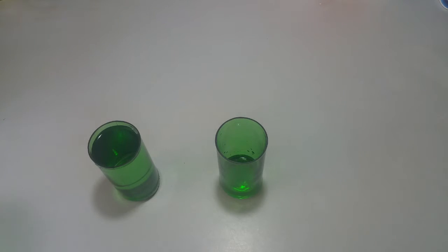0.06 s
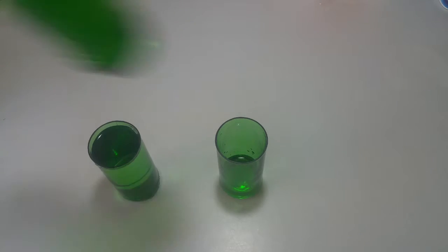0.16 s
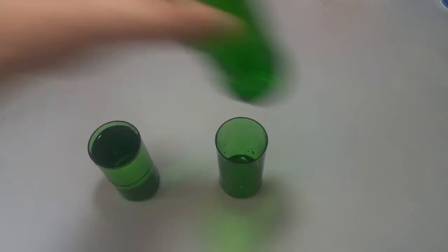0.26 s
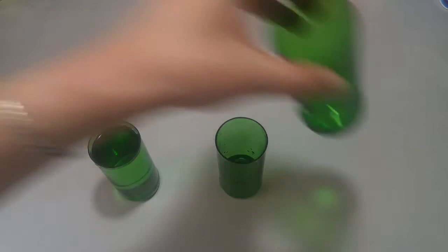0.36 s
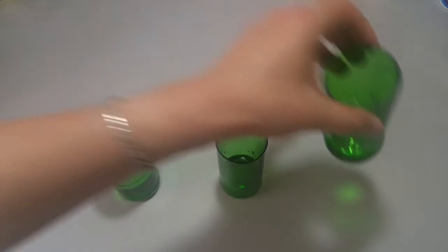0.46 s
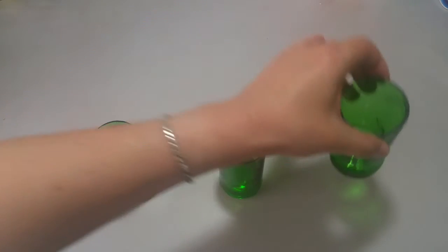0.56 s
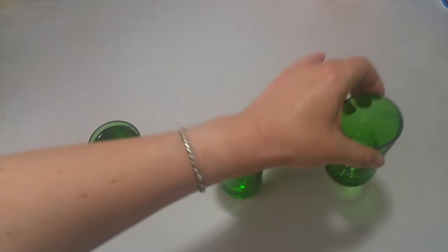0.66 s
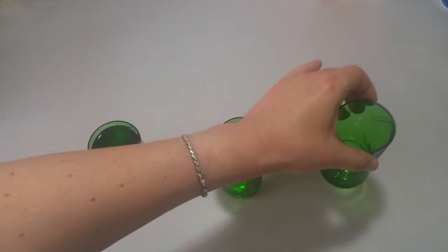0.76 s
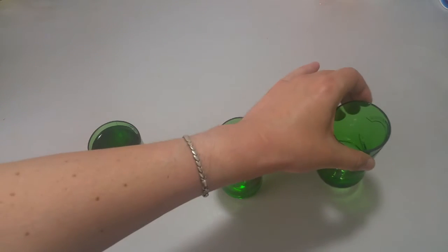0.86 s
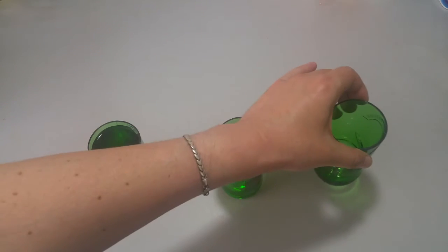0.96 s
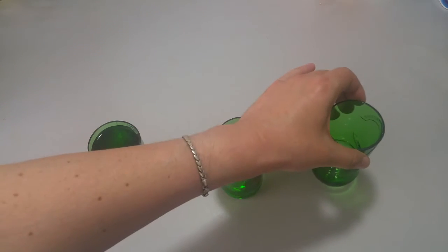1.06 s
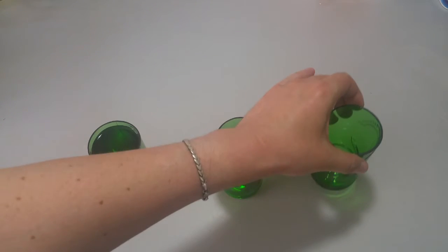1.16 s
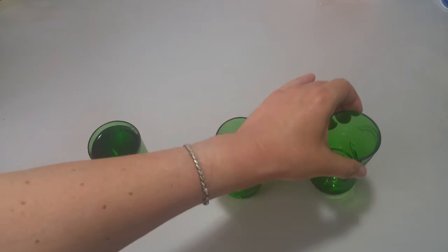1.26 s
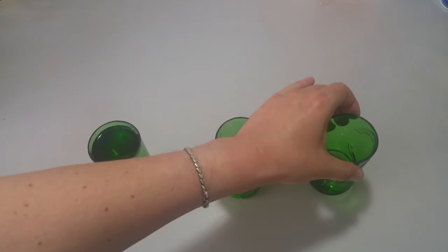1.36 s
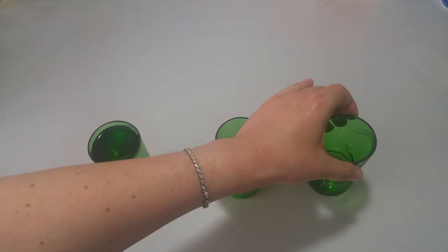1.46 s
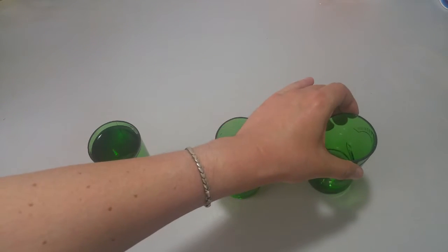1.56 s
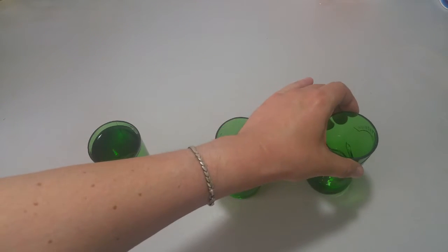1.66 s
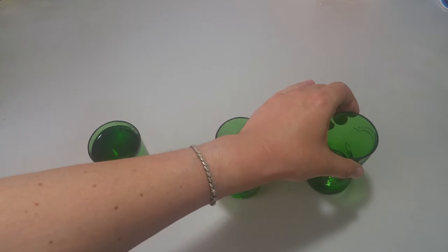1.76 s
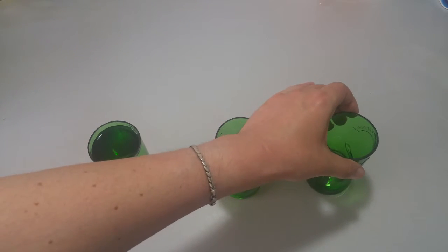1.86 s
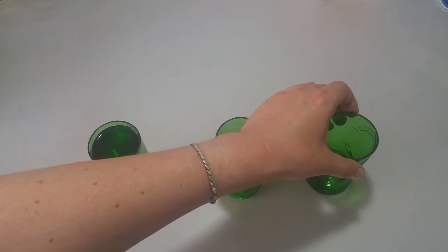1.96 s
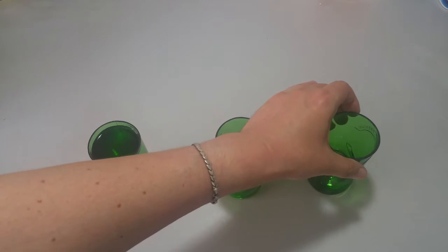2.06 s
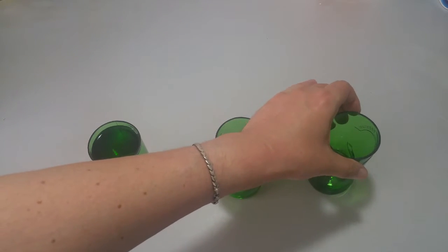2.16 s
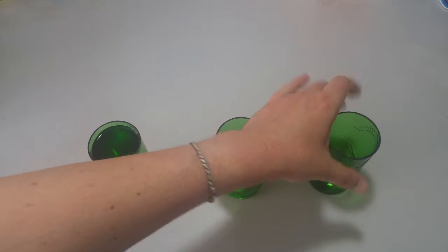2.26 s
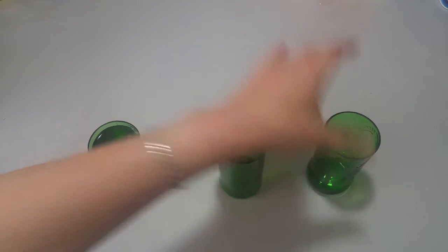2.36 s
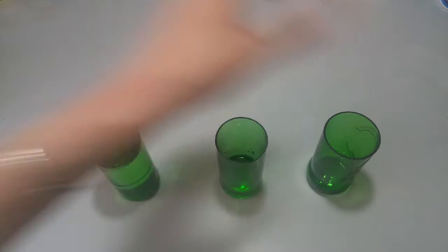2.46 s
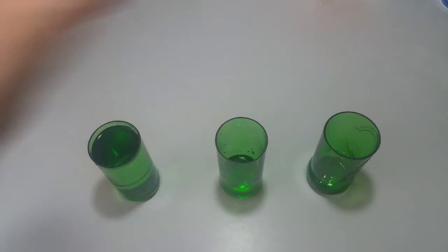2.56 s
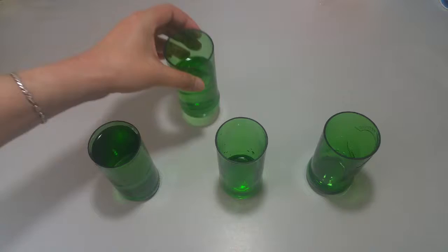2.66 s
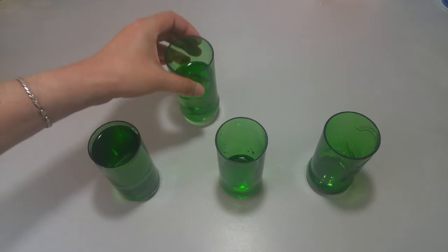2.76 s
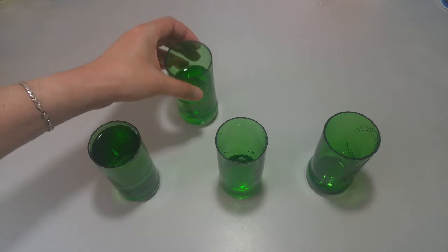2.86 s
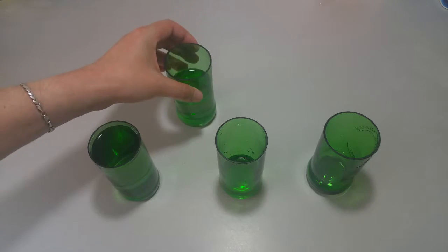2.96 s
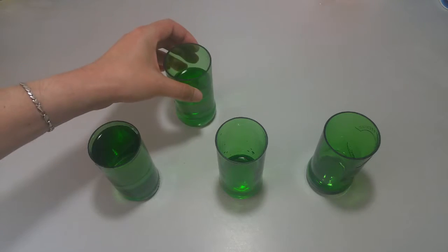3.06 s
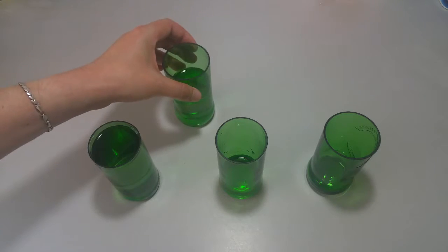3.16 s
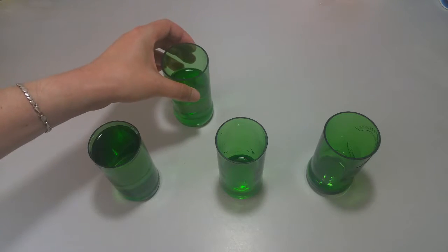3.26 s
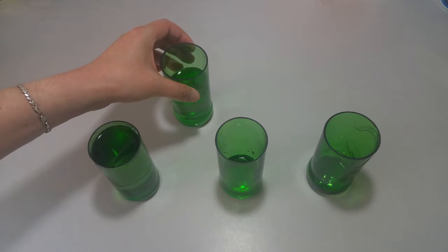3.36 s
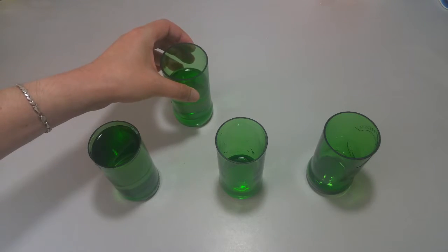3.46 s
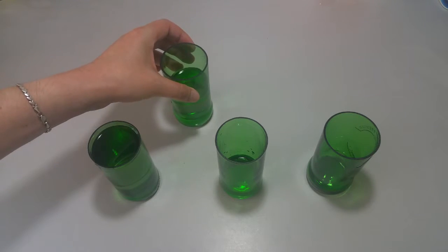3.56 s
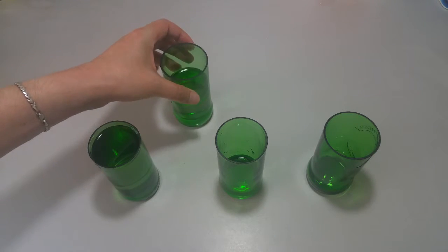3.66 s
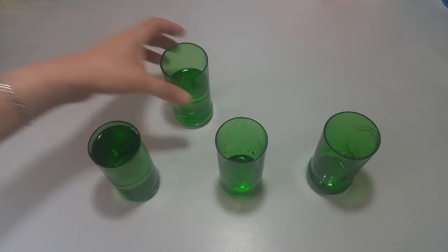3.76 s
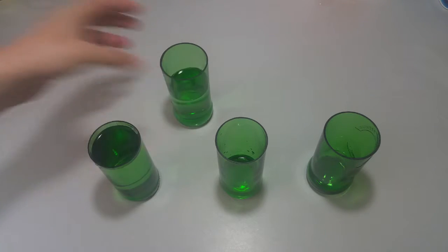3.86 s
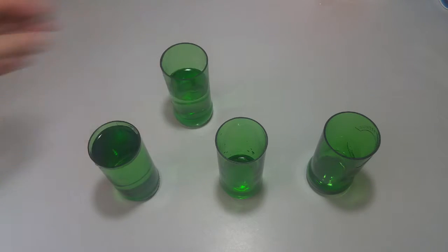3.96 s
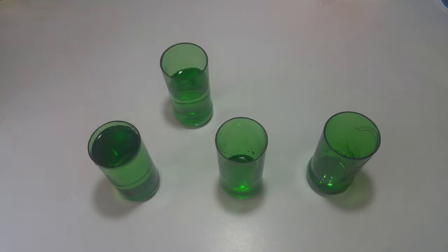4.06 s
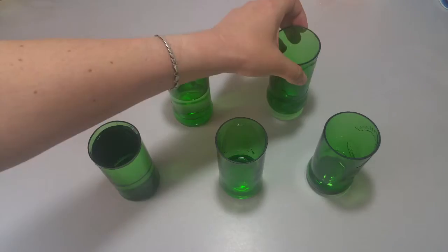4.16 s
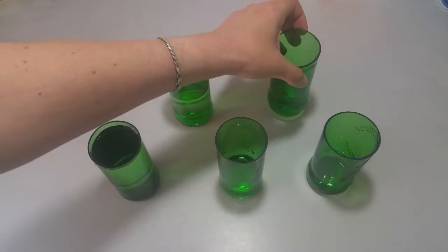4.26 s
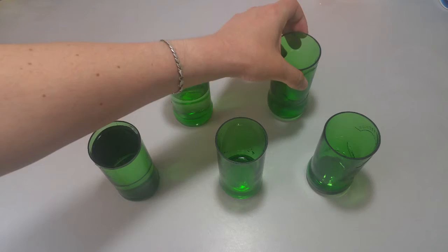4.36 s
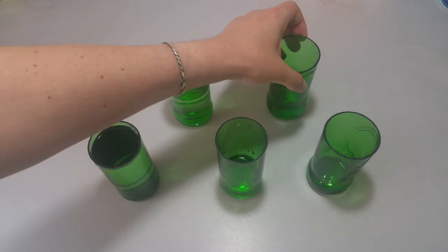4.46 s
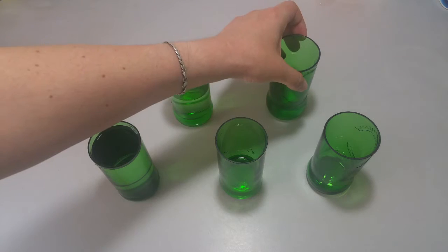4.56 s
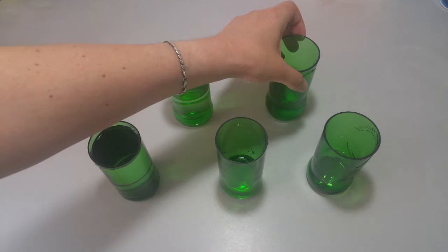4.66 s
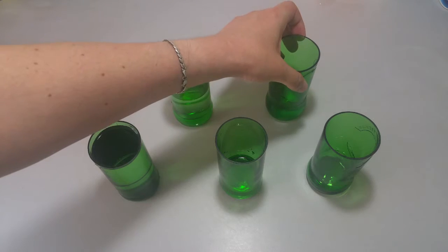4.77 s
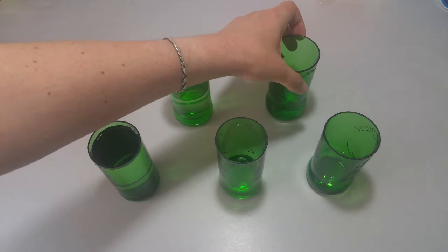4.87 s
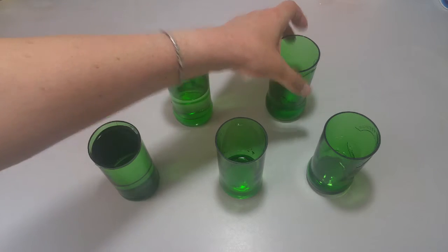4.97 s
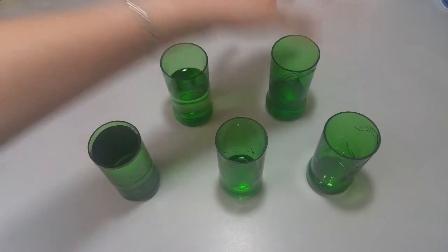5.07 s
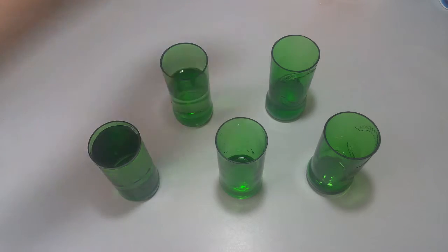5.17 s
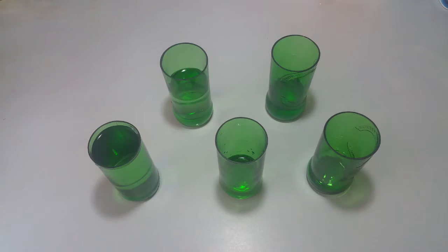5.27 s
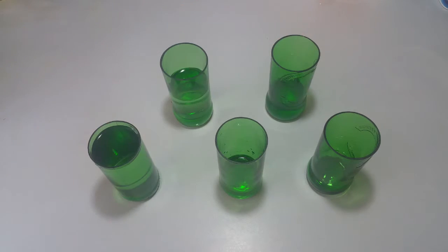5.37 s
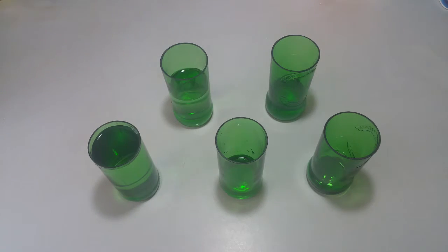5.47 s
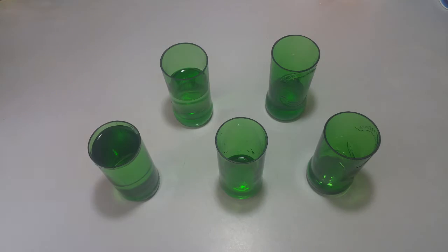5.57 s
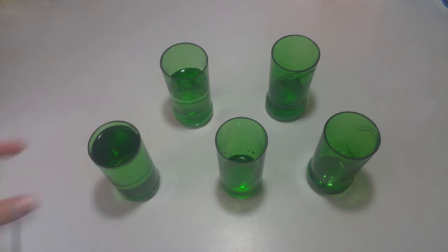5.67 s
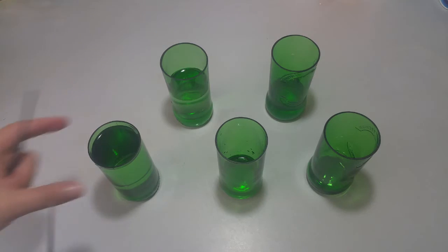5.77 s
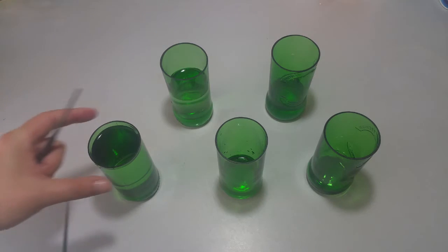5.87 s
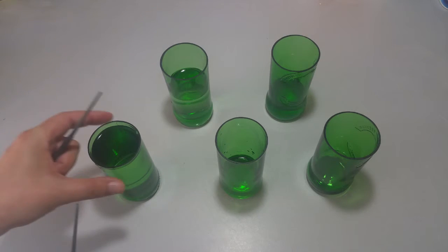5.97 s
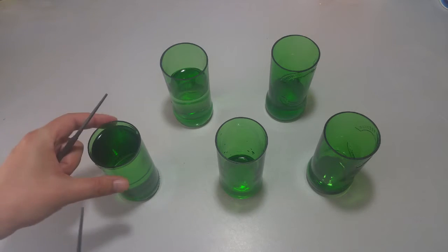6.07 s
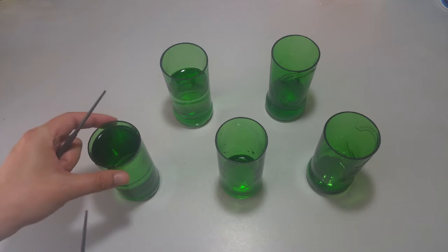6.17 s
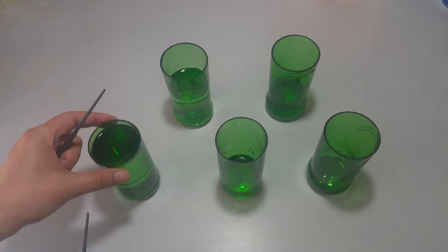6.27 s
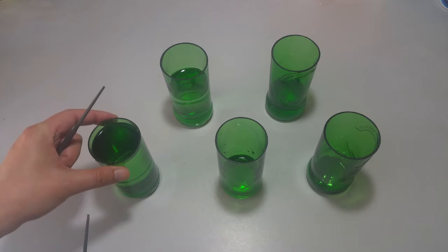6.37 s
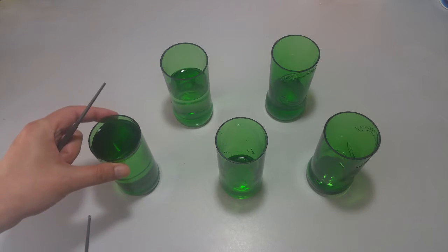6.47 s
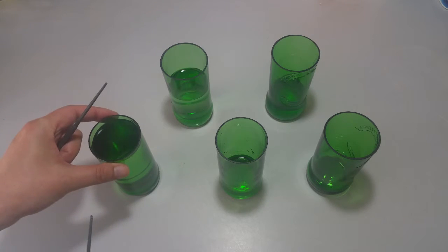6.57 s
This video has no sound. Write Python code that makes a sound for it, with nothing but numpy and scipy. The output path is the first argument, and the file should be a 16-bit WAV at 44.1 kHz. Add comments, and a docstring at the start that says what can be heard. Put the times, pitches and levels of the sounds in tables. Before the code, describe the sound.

Heavy glass tumblers are set down one at a time on a hard, hollow table in a bare, echoing room. The first lands with a moderate double knock and a brief ring. Two much louder knocks follow, well spaced, each a boom of the tabletop with a glassy clack. Faint rubs, clinks and light taps come after, and a glass is softly nudged at the end. The nearby microphone picks up a low hum and hiss.

```python
"""A bare, echoing room, where heavy glass tumblers are set down one by one on a hard, hollow table.
Each impact excites the modes of the top, which booms, and of the glass, which clacks; the walls reverberate.
One glass skims in with a hollow rush, bases rub by stick-slip friction, and glass clinks faintly as the
fingers let go. At the end a tumbler is gripped and nudged. Beneath lie a few light taps and swishes,
faint chirps, a low hum and microphone hiss."""
import sys
import numpy as np
from scipy import signal
from scipy.fft import rfft, irfft, next_fast_len
from scipy.io import wavfile
from scipy.ndimage import map_coordinates

SR = 44100
rng = np.random.default_rng(int(sys.argv[2]) if len(sys.argv) > 2 else 0)


def wav_out(sig):
    """Save sig, one row per channel (or a flat mono array), as 16-bit PCM at SR to the path in sys.argv[1]."""
    wavfile.write(sys.argv[1], SR, np.round(np.clip(np.atleast_2d(sig).T, -1, 1) * 32767).astype(np.int16))


N = 292383
T = np.arange(N) / SR
AGE = np.arange(SR) / SR  # the second that follows a blow

# Names of the spots struck: front right, front right rim, back left, back right.
SPOTS = ["front right", "front right rim", "back left", "back right"]
# Impacts of a base on the table. Each row: start in seconds, spot, gain in dB, bass gain in dB, contact
# corner in Hz, settling delay in seconds, settling blow in dB, attack gain in dB, clack delay in
# seconds, clack gain in dB. Levels in all tables are relative.
IMPACTS = [(1.534, "front right", -15, 0.5, 3470, .005, -11, -1.5, 0.00087, -1),
           (1.7902, "front right rim", -19, -10.5, 2600, .006, -13, -2, 0.0011, 5.5),
           (2.122, "front right rim", -38, -4, 3200, .0036, -15, -11, 0.011, -6),
           (3.0074, "back left", -2.5, -5.5, 3052, .0028, -3, 5, .002, -2.5),
           (4.5536, "back right", -1.5, -4.5, 3196, .0055, -2.5, 2.5, .001, 3.5),
           (6.272, "front right", -35, 1, 600, .005, -10, 3.5, .001, -14.5)]
# Normal modes of the tabletop. Each row: frequency in Hz, then level in dB for a blow at each spot.
TOP_MODES = [(56, -44, -43, -45, -46), (84, -39, -32, -29, -29), (100, -41, -39, -27, -30),
             (116, -32, -25, -15, -33), (135, -18, -26, -33, -25), (155, -23, -33, -33, -26),
             (171, -39, -22, -23, -43), (190, -21, -37, -20, -30), (224, -17, -28, -31, -40),
             (264, -22, -38, -21, -39), (285, -27, -24, -18, -18), (306, -27, -23, -20, -36),
             (327, -19, -17, -36, -26), (343, -25, -24, -22, -22), (365, -24, -26, -34, -24),
             (378, -47, -38, -27, -40), (405, -24, -30, -24, -40), (418, -28, -29, -19, -36),
             (436, -25, -18, -22, -24), (450, -39, -20, -22, -32), (467, -35, -32, -33, -27),
             (482, -25, -22, -16, -27), (497, -22, -18, -25, -29), (515, -26, -14, -33, -25),
             (560, -32, -31, -20, -22), (575, -30, -23, -30, -24), (608, -29, -22, -23, -37),
             (626, -20, -29, -34, -31), (647, -25, -30, -23, -24), (666, -19, -25, -16, -22),
             (683, -22, -33, -20, -24), (705, -23, -30, -32, -26), (721, -23, -20, -20, -22),
             (740, -34, -21, -24, -22), (761, -13, -19, -37, -25), (780, -22, -29, -25, -37),
             (797, -36, -37, -30, -29), (818, -27, -32, -37, -26), (834, -21, -26, -24, -23),
             (865, -33, -29, -21, -26), (897, -20, -23, -19, -27), (914, -22, -20, -26, -28),
             (942, -34, -21, -25, -23), (989, -19, -22, -21, -28), (1035, -27, -24, -41, -26),
             (1090, -44, -20, -33, -29), (1119, -36, -21, -35, -32), (1250, -42, -39, -39, -30)]
# Spectral envelope of the struck top. Each row: frequency in Hz, level in dB.
TOP_SPECTRUM = [(30, -48), (52, -22), (64, -23.5), (80, -8.5), (115, -10.5), (155, -6.5), (220, -10),
                (300, -6), (700, -4), (950, -5.5), (1150, -9), (1400, -13), (1650, -13), (1950, -18),
                (2300, -19), (3500, -24), (6500, -29), (9000, -34), (15000, -28)]
# First flex of the top. Each row: frequency in Hz, t60 in seconds, then level in dB at each spot.
FLEX_MODES = [(114, 0.089, -36, -44, -17, -20.5), (156.8, 0.03, -18, -38, -20.5, -21),
              (300, 0.034, -10, -7, -17.5, -26), (495, 0.045, -5, 0.5, -10.5, -15),
              (748, 0.028, -5, -27, -11.5, -8.5), (880, .04, -26, 2.5, -15.5, -23)]
# Modes of the gripped tumbler, keyed by spot. Each row: frequency in Hz, level in dB, t60 in seconds.
GLASS_MODES = {"front right": [(1390, -25, 0.24), (1532, -29.5, 0.32), (1610, -26, 0.15), (1680, -39, 0.33),
               (2300, -16.5, 0.022), (2500, -37, .025), (2580, -23, 0.029), (2910, -28, 0.039),
               (4400, -37, 0.03)], "front right rim": [(1058, -23.5, 0.31), (1380, -23.5, .11),
               (1476, -19.5, 0.062), (1685, -37, 0.31), (2005, -30, 0.078), (2630, -36, 0.052),
               (2700, -35, 0.036), (3080, -36, 0.046), (3660, -41, 0.035)], "back left": [(1112, -23, .08),
               (1278, -24, .09), (1400, -24, 0.025), (1620, -19, 0.051), (2175, -23.5, 0.13),
               (2290, -29, 0.038), (2710, -37.5, 0.027), (3180, -34, .04), (3920, -38.5, 0.036)],
               "back right": [(1212, -17, 0.019), (1295, -22.5, .06), (1350, -34, 0.042),
               (1665, -32, 0.089), (1880, -33.5, 0.14), (2200, -28.5, 0.04), (2800, -31, 0.018),
               (3660, -44, .02), (4430, -42, 0.02)]}
# Thuds of a rocking base. Each row: start in seconds, frequency in Hz, level in dB, t60 in seconds.
ROCKS = [(3.031, 363, -9, 0.038), (4.584, 327, -9, 0.044)]
# Strokes of a base on the top. Each row: start, swell and release in seconds, body level in dB,
# grit level in dB, bass gain in dB.
RUBS = [(2.112, 0.03, 0.097, -42, -68, -8), (2.259, 0.04, 0.15, -66.5, -70, 15.5),
        (2.28, 0.17, 0.12, -65.5, -66, 7), (3.27, .09, 0.15, -46.5, -71.5, 8.5),
        (3.68, 0.1, 0.4, -66, -71.5, 15), (5.11, 0.024, 0.58, -65, -70, 15),
        (6.265, 0.013, 0.29, -51, -74, 14.5), (6.365, 0.16, 0.052, -38.5, -59.5, 0)]
# Spectra of the rubbed top and of the hiss at the contact. Each row: frequency in Hz, level in dB.
RUB_SPECTRUM = [(35, -31.5), (65, -17.5), (100, 0.5), (170, -6.5), (320, 4), (550, -3), (850, -4),
                (1300, -15.5), (2500, -22), (6000, -64.5)]
GRIT_SPECTRUM = [(600, -31), (1500, -2.5), (2200, -6), (3600, 5), (5000, -5), (8000, -10.5), (15000, -20.5)]
# Hollow resonances of the skim. Each row: centre in Hz, width in Hz, level in dB.
SKIM_RESONANCES = [(308, 56, -1), (510, 110, -1.5), (655, 150, -9.5), (850, 73, -6)]
# Partials of released glass. Each row: start in seconds, frequency in Hz, level in dB, t60 in seconds.
CLINKS = [(2.31, 5798, -66, .35), (2.312, 2406, -59, 1.0), (2.335, 4850, -65.5, .35),
          (3.752, 3661, -67, .4), (3.772, 1669, -64, .45), (3.79, 5168, -71, .3), (4.6, 2277, -58.5, 1.4),
          (4.6, 4420, -70, 1.2), (4.955, 4450, -64.5, .35)]
# Taps as something small is picked up beside the table. Each row: start in seconds, level in dB.
TAPS = [(5.1905, -46.5), (5.1975, -52.5), (5.203, -50.5), (5.48, -55.5)]
# Broad resonances of a tap. Each row: frequency in Hz, level in dB.
TAP_SPECTRUM = [(600, -16), (1500, -11), (2080, 5), (2800, -10), (3500, 6.5), (4000, -10), (4450, 0),
                (5000, -14), (6300, -15), (9000, -22), (15000, -25)]
# Swishes above the table. Each row: start in seconds, level in dB, rise and t60 in seconds, treble in dB.
SWISHES = [(.15, -72, 0.29, 1.2, 1), (5.191, -60, 0.011, 0.47, -1), (5.473, -59.5, 0.019, 0.16, 1.5)]
# Spectrum of a swish. Each row: frequency in Hz, level in dB.
SWISH_SPECTRUM = [(600, -3.5), (1400, -5.5), (2200, -2), (3500, -3.5), (5000, -9), (8000, -17.5),
                  (15000, -24.5)]
# Falling chirps. Each row: start in seconds, final pitch in Hz, level in dB.
CHIRPS = [(0.193, 3150, -70), (.845, 3340, -70), (1.199, 2970, -67), (3.608, 3190, -71), (5.59, 3000, -74),
          (6.054, 3270, -71)]
# One high, arched call: length in seconds, pitch at both ends in Hz, arch height in Hz, level in dB.
WHISTLE = (0.215, 7247, 849, -81.5)
# Partials of the hum. Each row: frequency in Hz, level in dB.
HUM = [(113.0, -73.5), (209.9, -73), (285.3, -76.5), (349.9, -83), (436.0, -80.5)]
# Spectrum of room noise and hiss. Each row: frequency in Hz, level in dB.
FLOOR_SPECTRUM = [(15, -58), (25, -36.5), (48, -7), (107, -14.5), (169, -11), (193, -12.5), (213, 3),
                  (240, -14.5), (285, -15.5), (359, -17), (704, -23), (3630, -29.5), (5200, -35),
                  (8500, -39), (12200, -33), (13500, -38), (15600, -43)]
# Coherence of that noise and of the reverberant field. Each row: frequency in Hz, left-right correlation.
FLOOR_COHERENCE = [(60, 0.0023), (180, 0.11), (550, 0.39), (1650, -0.44), (4970, -0.011), (15000, -0.32)]
ROOM_COHERENCE = [(100, 1), (300, 0.75), (500, 0.71), (750, 0.24), (1000, -0.25), (1400, -0.027),
                  (2000, 0.15)]
# Reverberation time. Each row: frequency in Hz, t60 (the time to fall by 60 dB) in seconds.
ROOM_T60 = [(60, 1), (160, .64), (420, 0.72), (1100, 0.68), (2900, 0.61), (7700, 0.48), (14000, 0.27)]


def knocks(early_t60=0.049, shelf_hz=260):
    """Impact excitation: a base lands on its edge and settles; the top booms and the glass clacks."""
    out = np.zeros((2, N))
    for start, spot, db, bass_db, corner_hz, settle_s, settle_db, attack_db, clack_s, clack_db in IMPACTS:
        # bending waves cross the top many times before the room takes over
        early = stereo_noise(ROOM_COHERENCE, SR) * amp(-60 * AGE / early_t60)
        early /= np.linalg.norm(early[0])
        blow = amp(attack_db + 15) * early + amp(31) * room_tail()
        colour = lambda hz: causal(amp(along(TOP_SPECTRUM, hz)) * ripple(hz, width_hz=91, depth_db=2.5))
        boom = filtered(blow, colour) + amp(1) * top_modes(spot)
        boom += amp(attack_db) * thump(spot, settle_s, settle_db)
        # a soft contact loses treble, a light one loses bass
        contact = lambda hz: causal(amp(bass_db / (1 + (hz / shelf_hz) ** 2)) / (1 + (hz / corner_hz) ** 2))
        add(out, start, amp(db) * filtered(boom, contact))
        add(out, start + clack_s, amp(db + clack_db) * clack(spot))
    return out


def top_modes(spot, t60_share=0.73, build_s=0.0023, beat_depth=0.28, beat_hz=6):
    """Modal superposition: the top rings in damped modes whose strengths depend on the spot struck."""
    rows = np.array(TOP_MODES)
    hz, db = rows[:, :1], rows[:, 1 + SPOTS.index(spot), None]
    phase, skew = rng.uniform(-np.pi, np.pi, (2, *hz.shape))
    spread = np.sign(skew) * stereo_angle(ROOM_COHERENCE, hz)
    envelope = decay(db, t60_share * along(ROOM_T60, hz)) * onset(build_s)
    # each mode couples to a room mode close by, so it beats as it dies
    offset_hz = rng.normal(0, beat_hz, hz.shape)
    lag = rng.uniform(0, 2 * np.pi, hz.shape)
    beating = 1 + beat_depth * np.exp(1j * (2 * np.pi * offset_hz * AGE + lag))
    ring = envelope * np.exp(1j * (2 * np.pi * hz * AGE + phase)) * beating
    return np.array([np.sum(ring * np.exp(1j * side * spread), axis=0).imag for side in (1, -1)])


def thump(spot, settle_s, settle_db, cutoff_hz=95):
    """Heavily damped flexure: the top bends under the base's edge, then again as it settles flat."""
    hz, t60, *spot_db = np.transpose(FLEX_MODES)[:, :, None]
    spread = stereo_angle(ROOM_COHERENCE, hz)
    envelope = decay(spot_db[SPOTS.index(spot)], t60) * onset(0.0001)
    phase = 2 * np.pi * hz * AGE
    flex = np.array([-np.sum(envelope * np.sin(phase + side * spread), axis=0) for side in (1, -1)])
    settling = lambda f: 1 + amp(settle_db) * np.exp(-2j * np.pi * f * settle_s)
    # air slips round the table's edge, so the deepest bass does not radiate
    radiation = lambda f: causal(f ** 3 / np.hypot(f ** 3, cutoff_hz ** 3))
    return filtered(flex, lambda f: settling(f) * radiation(f))


def clack(spot, burst_t60=0.037):
    """Damped free vibration: gripping fingers absorb the glass's modes; their first burst reverberates."""
    ring = sum(decay(db, t60) * np.sin(2 * np.pi * (hz * AGE + rng.random()))
               for hz, db, t60 in GLASS_MODES[spot])
    ring *= onset(0.00045)
    burst = ring * decay(0, burst_t60)
    return ring + signal.fftconvolve(burst[None], room_tail(), axes=1)[:, :SR]


def rocks(ramp_s=0.0074):
    """Gradual loading excites little treble: a tumbler rocks flat with a second, duller thud."""
    thuds = np.zeros(N)
    for start, hz, db, t60 in ROCKS:
        add(thuds, start, decay(db, t60) * AGE / ramp_s * np.sin(2 * np.pi * hz * AGE))
    return thuds + amp(-12) * in_room(thuds, direct_db=-29.5)


def rubs(shelf_hz=330):
    """Stick-slip friction drives the top's resonances with noise and hisses at the contact."""
    body = filtered(coloured_noise(RUB_SPECTRUM), lambda hz: ripple(hz, width_hz=87, depth_db=0.5))
    grit = coloured_noise(GRIT_SPECTRUM)
    rub = np.zeros((2, N))
    for start, swell_s, release_s, body_db, grit_db, bass_db in RUBS:
        envelope = stroke(start, swell_s, release_s)
        # firmer pressure shakes the whole top and so adds bass
        rub += filtered(envelope * body, lambda hz: amp(body_db + bass_db / (1 + (hz / shelf_hz) ** 4)))
        rub += amp(grit_db) * envelope * grit
    return amp(-2) * rub + amp(-6) * in_room(rub[0], direct_db=-18)


def skim():
    """Resonant filtering of noise: a glass skims in to land with a soft, hollow rush."""
    hollow = lambda hz: sum(amp(db) / (1 + (2 * (hz - centre) / width) ** 2)
                            for centre, width, db in SKIM_RESONANCES)
    rush = unit_rms(filtered(stereo_noise(ROOM_COHERENCE, N), hollow))
    return amp(-57.5) * stroke(start=2.68, swell_s=0.13, release_s=1) * rush


def clinks(split_hz=6, twin_gain=0.25):
    """Beating of close mode pairs: glass rings on as the grip loosens and the fingers leave it."""
    ring = np.zeros(N)
    for start, hz, db, t60 in CLINKS:
        pair = np.sin(2 * np.pi * hz * AGE) + twin_gain * np.sin(2 * np.pi * (hz + split_hz) * AGE)
        add(ring, start, decay(db, t60) * onset(0.0095) * pair)
    return amp(-10) * in_room(ring, direct_db=5.5)


def taps(t60=0.015):
    """Heavy damping gives broad resonances: each tap is an unpitched burst, deadened by the hand."""
    ticks = np.zeros(N)
    for start, db in TAPS:
        burst = unit_rms(filtered(rng.standard_normal(SR), lambda hz: amp(along(TAP_SPECTRUM, hz))))
        add(ticks, start, burst * decay(db, t60))
    return in_room(ticks, direct_db=-0.5)


def swishes(grain_db=4.5, shelf_hz=4200):
    """Random amplitude modulation makes bright noise into grainy rustles that leave the table still."""
    hiss = unit_rms(amp(grain_db * wobble(400))) * coloured_noise(SWISH_SPECTRUM)
    rustle = np.zeros((2, N))
    for start, db, rise_s, t60, treble_db in SWISHES:
        rise = np.clip((T - start) / rise_s, 0, 1)
        fall = amp(db - 60 * np.maximum(T - start - rise_s, 0) / t60)
        shelf = lambda hz: amp(treble_db * hz ** 4 / (hz ** 4 + shelf_hz ** 4))
        rustle += filtered(rise * fall * hiss, shelf)
    return amp(-0.5) * (rustle + in_room(rustle[0], direct_db=-29))


def chirps(chirp_s=0.11, overshoot=0.46):
    """Frequency glides: short, raspy whistles fall in pitch, and a high, clearer one arches."""
    falling, arching = np.zeros((2, N))
    progress = np.clip(AGE / chirp_s, 0, 1)
    for start, final_hz, db in CHIRPS:
        pitch = final_hz * (1 + overshoot * (1 - progress) ** 2)
        add(falling, start, amp(db) * glide(pitch, progress, jitter_hz=380))
    length_s, end_hz, arch_hz, db = WHISTLE
    progress = np.clip(AGE / length_s, 0, 1)
    pitch = end_hz + arch_hz * np.sin(np.pi * progress)
    add(arching, start=0.6, sound=amp(db) * glide(pitch, progress, jitter_hz=120))
    return in_room(falling, direct_db=-6) + in_room(arching, direct_db=5)


def glide(hz, progress, jitter_hz):
    """Random frequency modulation roughens a tone under a half-sine envelope."""
    phase = 2 * np.pi * np.cumsum(hz + jitter_hz * wobble(900)[:SR]) / SR
    return np.sin(np.pi * progress) * np.sin(phase)


def background(drift_rad=0.73):
    """Stationary room noise and hiss, with a hum made slightly unsteady by phase modulation."""
    hum = sum(amp(db) * np.sqrt(2) * np.sin(2 * np.pi * hz * T + drift_rad * wobble(7.3))
              for hz, db in HUM)
    floor = amp(-61) * coloured_noise(FLOOR_SPECTRUM, FLOOR_COHERENCE)
    return panned(floor + amp(-1) * hum, [(300, -3.5), (2000, -1), (8000, -0.5), (14000, 5.5)])


def room_tail():
    """Diffuse reverberation of unit mean energy per channel; each frequency decays at its own rate."""
    hz, t, spectra = signal.stft(stereo_noise(ROOM_COHERENCE, SR), SR, nperseg=256)
    spectra *= amp(-60 * t / along(ROOM_T60, hz)[:, None])
    tail = signal.istft(spectra, SR, nperseg=256)[1][:, :SR]
    return tail / np.sqrt(np.sum(tail ** 2) / 2)


def in_room(x, direct_db):
    """Convolution with the room's response adds reverberation to the direct sound."""
    return amp(direct_db) * x + signal.fftconvolve(x[None], room_tail(), axes=1)[:, :N]


def ripple(hz, width_hz, depth_db):
    """Modal overlap: crowded resonances give a gain that varies randomly with frequency."""
    knots = rng.standard_normal(SR // 8)
    return amp(depth_db * hz / (hz + 500) * map_coordinates(knots, [hz / width_hz], mode="mirror"))


def stroke(start, swell_s, release_s, range_db=20, edge_s=0.025):
    """Level follows pressure, which grows and lets go evenly in dB, with soft ends."""
    end = start + swell_s + release_s
    pressure = np.interp(T, [start, start + swell_s, end], [0, 1, 0])
    return amp(range_db * (pressure - 1)) * np.clip(np.minimum(T - start, end - T) / edge_s, 0, 1)


def stereo_angle(coherence, hz):
    """Half the phase difference that gives this left-right correlation."""
    return np.arccos(np.clip(along(coherence, hz), -1, 1)) / 2


def stereo_noise(coherence, size):
    """Mid-side mixing gives white noise a set coherence at each frequency."""
    angle = lambda hz: stereo_angle(coherence, hz)
    weights = lambda hz: np.array([np.cos(angle(hz)), np.sin(angle(hz))])
    mid, side = filtered(rng.standard_normal((2, size)), weights)
    return np.array([mid + side, mid - side])


def coloured_noise(spectrum, coherence=ROOM_COHERENCE):
    """Spectrally shaped stereo noise of rms 1."""
    return unit_rms(filtered(stereo_noise(coherence, N), lambda hz: amp(along(spectrum, hz))))


def panned(x, balance):
    """Level difference shifts a sound aside. Each point: frequency in Hz, left minus right in dB."""
    return filtered(x, lambda hz: amp(np.outer([.5, -.5], along(balance, hz))))


def filtered(x, response):
    """Linear filtering: the spectrum is multiplied by a frequency response."""
    size = next_fast_len(x.shape[-1] + 8192)
    return irfft(rfft(x, size) * response(np.fft.rfftfreq(size, 1 / SR)), size)[..., :x.shape[-1]]


def causal(gain):
    """The minimum-phase response with this gain: nothing sounds before the blow."""
    cepstrum = irfft(np.log(np.maximum(gain, 1e-6)))
    half = len(cepstrum) // 2
    return np.exp(rfft(np.r_[cepstrum[0], 2 * cepstrum[1:half], cepstrum[half], np.zeros(half - 1)]))


def decay(db, t60):
    """Exponential decay from a level in dB."""
    return amp(db - 60 * AGE / t60)


def onset(rise_s):
    """Exponential approach to full amplitude."""
    return 1 - np.exp(-AGE / rise_s)


def wobble(rate):
    """A smooth random curve with rate knots a second."""
    return map_coordinates(rng.standard_normal(int(N * rate / SR) + 4), [T * rate])


def along(points, hz):
    """Interpolation on a logarithmic frequency axis."""
    knots_hz, values = np.transpose(points)
    return np.interp(np.log(hz + 1), np.log(knots_hz + 1), values)


def amp(db):
    """Decibels to amplitude ratio."""
    return 10 ** (np.asarray(db) / 20)


def unit_rms(x):
    """Normalisation to rms 1."""
    return x / np.sqrt(np.mean(x ** 2) + 1e-20)


def add(track, start, sound):
    """Superpose a sound on a track, from a start in seconds."""
    first = round(start * SR)
    part = sound[..., :N - first]
    track[..., first:first + part.shape[-1]] += part


def scene():
    """Superposition of all sources; the knocks lie a little to the right."""
    balance = [(300, -0.5), (500, 0.5), (720, -3), (1100, -2)]
    tumblers = panned(knocks(), balance) + rocks() + rubs() + skim() + clinks()
    return tumblers + taps() + swishes() + chirps() + background()


def record(dry, ceiling=0.82, top_hz=15720):
    """Soft saturation rounds the tallest peaks; an ideal low-pass filter limits the band."""
    rounded = dry / (1 + np.abs(dry / ceiling) ** 4) ** (1 / 4)
    return filtered(rounded, lambda hz: hz < top_hz)


dry = scene()
out = record(dry)
wav_out(out)
```